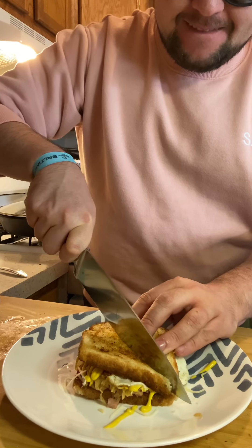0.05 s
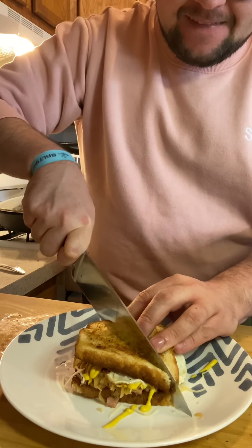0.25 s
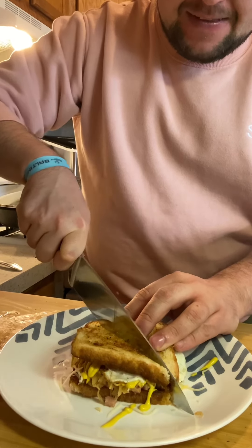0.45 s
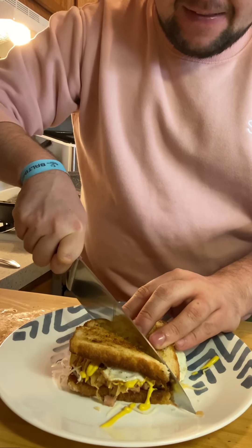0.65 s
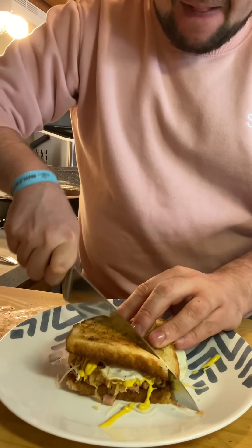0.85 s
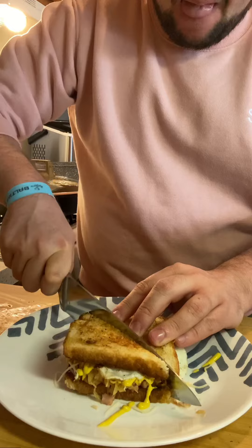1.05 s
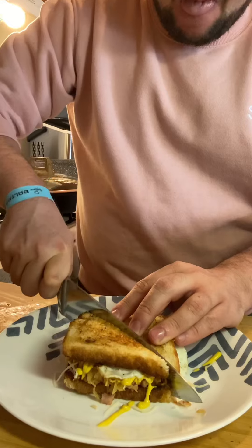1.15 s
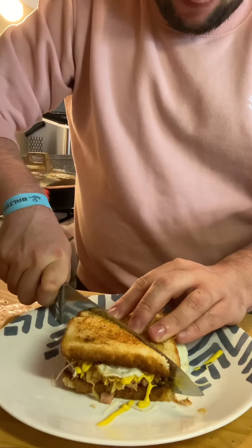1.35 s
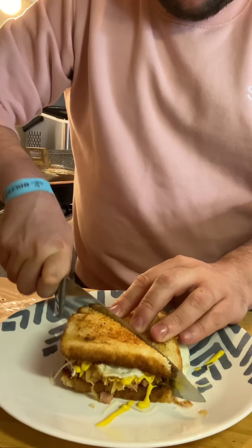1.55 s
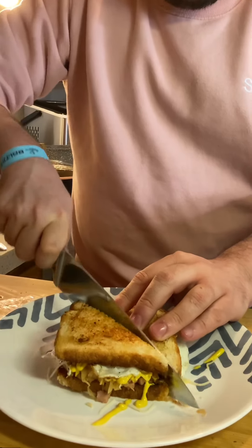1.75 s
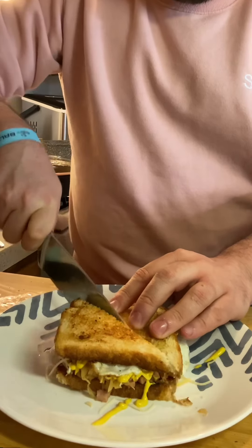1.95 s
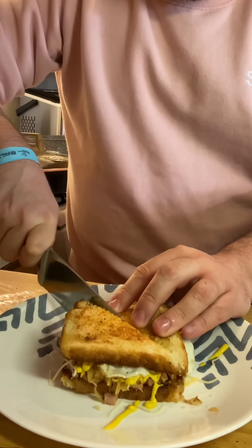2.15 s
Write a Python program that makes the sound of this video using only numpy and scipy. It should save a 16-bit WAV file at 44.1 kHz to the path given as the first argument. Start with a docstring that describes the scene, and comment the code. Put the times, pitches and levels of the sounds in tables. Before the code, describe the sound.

A knife saws through a crisp toasted sandwich, close up in a small kitchen. The crust crunches and crackles in uneven pushes while the blade scrapes the china plate and knocks on it twice sharply, then once faintly.

```python
"""In a small kitchen, a chef's knife saws through a toasted sandwich on a china plate.
Each push crushes the crust into a swarm of tiny fractures while the blade's tip scrapes the china.
Single flakes snap, and the filling squelches once. Three times the blade breaks through and knocks
on the plate; the wooden table thumps and rumbles under the effort."""
import sys
import numpy as np
from scipy import signal
from scipy.fft import rfft, irfft, next_fast_len
from scipy.io import wavfile
from scipy.ndimage import uniform_filter1d

SR = 44100
rng = np.random.default_rng(int(sys.argv[2]) if len(sys.argv) > 2 else 0)


def to_wav(sig):
    """Store sig (one row per channel, or 1-D mono) as 16-bit WAV at the path in sys.argv[1].

    Samples outside -1..1 are clipped; the rate is SR.
    """
    pcm = np.clip(np.atleast_2d(sig), -1, 1) * 32767
    pcm = np.round(pcm).astype(np.int16)
    wavfile.write(sys.argv[1], SR, pcm.T)  # frames by channels


N = 97020
T = np.arange(N) / SR
SIZE = next_fast_len(N + SR // 2, real=True)   # FFT length with space for the room's tail
HZ = np.maximum(np.arange(SIZE // 2 + 1) * SR / SIZE, 1)
MIC_LAG_S = 0.00009   # the left microphone hears the direct sound this much later


def from_db(db):
    """Decibels to gain."""
    return 10 ** (np.asarray(db) / 20)


def rms_one(x):
    """Scale to unit power."""
    return x / np.sqrt(np.mean(x ** 2) + 1e-20)


def steady(x):
    """Even out the slow swings of a low noise."""
    return x / np.sqrt(uniform_filter1d(x ** 2, size=3000) + 1e-12)


def gains(points):
    """An EQ curve of (Hz, dB) points as a gain at every frequency."""
    hz, db = np.transpose(points)
    return from_db(np.interp(np.log(HZ), np.log(hz), db))


def coloured(x, points):
    """Minimum-phase EQ that keeps the power of white noise."""
    cepstrum = irfft(np.log(rms_one(gains(points))), SIZE)
    cepstrum[1:SIZE // 2] *= 2
    cepstrum[SIZE // 2 + 1:] = 0
    return irfft(rfft(x, SIZE) * np.exp(rfft(cepstrum)), SIZE)[..., :N]


def ring(x, hz, t60):
    """A unit click sets a sine of height 1 ringing."""
    r, w = from_db(-60 / (t60 * SR)), 2 * np.pi * hz / SR
    return signal.lfilter([0, np.sin(w)], [1, -2 * r * np.cos(w), r * r], x + 1e-18)


def resonance(x, hz, t60):
    """Band-pass with gain 1 at its centre."""
    r, w = from_db(-60 / (t60 * SR)), 2 * np.pi * hz / SR
    return signal.lfilter(np.array([1, 0, -1]) * (1 - r * r) / 2, [1, -2 * r * np.cos(w), r * r], x)


def contact(start, decay_s, trail_db):
    """One click and a dying trail of smaller ones; unit energy."""
    decay = (T >= start) * np.exp(-np.clip((T - start) / decay_s, 0, 20))
    clicks = from_db(trail_db) * decay * rng.standard_normal(N)
    clicks[int(start * SR)] = 1
    return clicks / np.sqrt(np.sum(clicks ** 2))


def fractures(per_s):
    """A swarm of clicks of very uneven size that come in clumps; unit power."""
    spread_db, clump_db, clumps_per_s = 2.5, 3.0, 110
    clumps = np.interp(T * clumps_per_s, np.arange(N), rng.standard_normal(N))
    sizes_db = spread_db * np.minimum(rng.exponential(1, N), 4) + clump_db * np.clip(clumps, -2, 2)
    return rms_one(from_db(sizes_db) * rng.choice([-1, 1], N) * (rng.random(N) < per_s / SR))


def crust():
    """Each push crushes the crust into crunch and crisp crackle; the blade's tip catches and slips."""
    # Pushes of the knife. Each row: start in seconds, swell time in seconds, rise over the swell in dB,
    # seconds to fade by 60 dB, then the levels of crunch, crackle and scrape in dB.
    pushes = [(0.0, 0.065, 2, 3, -53.5, -56.5, -51), (0.131, 0.091, 24.5, 0.2949, -28.5, -35, -16),
              (0.231, 0.013, -1, 0.215, -34, -35, -20.5), (.36, 0.25, -1, 0.5, -55, -53.5, -73),
              (.665, 0.0095, 6, 0.73, -45, -47, -45), (.803, 0.07, 7, 0.0352, -34.5, -37, -54),
              (1.038, 0.069, 10.5, 0.63, -36.5, -39, -24), (1.216, 0.033, 5.5, 0.1053, -36.5, -37, -28.5),
              (1.27, 0.058, 5.5, 0.11, -45, -46.5, -38.5), (1.328, 0.011, 5.5, 0.25, -26.5, -41.5, -21.5),
              (1.41, 0.17, 3.5, 0.01, -49.5, -85.5, -43), (1.525, 0.023, -2, 0.0241, -43.5, -73.5, -34),
              (1.611, 0.016, -7, 0.9, -65.5, -63, -55), (1.80, 0.05, 6, 1.4, -63.5, -71, -59),
              (2.018, 0.057, 18.5, 0.1, -48, -57, -43.5), (2.085, 0.0082, 6, 0.21, -39.5, -54, -26.5)]
    # Tone of the crushed bread and of its brittle surface. Each row: frequency in Hz, gain in dB.
    crunch_eq = [(60, -17.5), (150, -5.5), (300, -5.5), (550, -5.5), (900, -4.5), (1500, -1), (2200, -1),
                 (2800, -4), (3800, -2.5), (4450, 5.5), (5300, -16), (8000, -10.5), (15000, -34)]
    crackle_eq = [(500, -36), (3000, -17.5), (4700, 1), (5900, 0), (7500, 2.5), (10000, 2), (12500, 3.5),
                  (14000, -0.5), (16000, -12.5)]
    powers = np.zeros((3, N))
    for start, swell, rise_db, fade, *levels_db in pushes:
        age = T - start - swell
        envelope_db = np.where(age < 0, rise_db * np.maximum(age / swell, -1), -60 * age / fade)
        envelope = (T >= start) * from_db(envelope_db)
        powers += (from_db(levels_db)[:, None] * envelope) ** 2
    swarm = fractures(per_s=5000)
    flakes = from_db(-0.5) * fractures(per_s=280)   # lone, larger fractures
    slips = rms_one(fractures(per_s=1500) + flakes / 2)
    bread = rms_one(swarm + flakes / 2)
    surface = rms_one(fractures(per_s=5000) + flakes)
    crunch, crackle, scrape = np.sqrt(powers) * [bread, surface, slips]
    return coloured(crunch, crunch_eq) + coloured(crackle, crackle_eq) + blade(scrape)


def blade(x):
    """Slips and jolts sound through the resonances of blade and plate."""
    # Steel on china. Each row: frequency in Hz, ring time (t60) in seconds, gain in dB.
    rings = [(766.5, 0.045, -3.5), (1120, 0.028, -6.5), (1517, 0.031, 4.5), (1837, 0.022, 5.5),
             (2225, 0.028, 4.5), (2398, 0.055, 5.5), (2920, 0.024, 1), (3337, 0.022, 0.5),
             (4407, 0.017, -3.5)]
    return sum((-1) ** k * from_db(db) * resonance(x, hz, t60) for k, (hz, t60, db) in enumerate(rings))


def wooden_table():
    """The table rumbles while the knife works and takes the blows with low thumps."""
    # Fader moves. Each row: time in seconds, rumble level in dB, thudding level in dB before its trim.
    shake = [(0.0, -54, -53), (0.13, -65, -58), (0.2, -41, -36.5), (0.24, -43, -29), (0.27, -29.5, -26),
             (0.29, -38, -30.5), (0.36, -50.5, -46.5), (0.51, -46.5, -53.5), (0.73, -45.5, -56.5),
             (0.86, -36.5, -42.5), (0.95, -49, -70.5), (1.04, -65, -57), (1.11, -39, -41),
             (1.21, -45.5, -47), (1.27, -36.5, -43.5), (1.32, -54.5, -47.5), (1.37, -40, -25.5),
             (1.41, -46, -41), (1.45, -50, -47.5), (1.5, -49, -57), (1.54, -37.5, -45.5), (1.571, -47, -57),
             (1.61, -56.5, -50.5), (1.699, -65.5, -71.5), (1.95, -65, -76.5), (2.1, -64, -59.5),
             (2.14, -65, -59), (2.2, -84, -57)]
    # Tone of the deep rumble and of the thudding above it. Each row: frequency in Hz, gain in dB.
    rumble_eq = [(25, -34.5), (42, -18.5), (56, 6), (80, 3), (100, -8), (130, -23.5), (250, -41.5)]
    thudding_eq = [(70, -28.5), (100, -7.5), (125, 3.5), (185, -3.5), (260, -13), (400, -12), (600, -26.5),
                   (1500, -54.5)]
    # Blows to the wood. Each row: start in seconds, pitch in Hz, level in dB, t60 in seconds.
    thumps = [(0.263, 128, -21, 0.032), (0.272, 64, -22, 0.1), (0.775, 56.5, -31, 0.23),
              (1.244, 77, -29, 0.16), (1.364, 151, -7.5, 0.049), (1.376, 59.8, -25, 0.15),
              (2.127, 77.2, -33.5, 0.25)]
    thudding_trim_db, attack_s = -2, 0.0038
    times, rumble_db, thudding_db = np.transpose(shake)
    rumble = steady(coloured(rng.standard_normal(N), rumble_eq))
    thudding = steady(coloured(rng.standard_normal(N), thudding_eq))
    wood = from_db(np.interp(T, times, rumble_db)) * rumble
    wood += from_db(thudding_trim_db + np.interp(T, times, thudding_db)) * thudding
    for start, hz, db, t60 in thumps:
        age = np.maximum(T - start, 0)
        envelope = from_db(db - 60 * age / t60) * (1 - np.exp(-age / attack_s))
        wood += envelope * np.sin(2 * np.pi * hz * age)
    return wood


def snaps():
    """Single flakes break with a dry click; each rings for an instant and jolts the blade."""
    # Breaking flakes. Each row: start in seconds, treble level in dB, body level in dB.
    breaks = [(0.0173, -50.5, -45), (0.0598, -47, -44.5), (0.136, -39, -43), (0.153, -38, -36.5),
              (.445, -34, -37.5), (0.467, -58, -63), (.510, -59, -44), (.571, -40, -41.5),
              (.622, -48, -38.5), (0.681, -51, -46), (.695, -46, -46.5), (0.711, -41, -41),
              (0.719, -41.5, -48), (.767, -37, -37.5), (0.4916, -41, -41.5), (0.5598, -41.5, -44.5),
              (0.594, -58, -48), (0.613, -35.5, -37.5), (.672, -33.5, -41), (.750, -31.5, -43.5),
              (0.806, -26, -36.5), (0.8168, -32, -53), (.828, -36, -49), (0.8384, -31, -23),
              (.887, -38.5, -39), (.9925, -58.5, -48), (1.005, -55.5, -57), (1.019, -60.5, -61.5),
              (1.043, -39.5, -38.5), (1.061, -41, -38.5), (1.089, -43, -36.5), (1.128, -30.5, -37),
              (1.22, -39, -33), (1.332, -38.5, -24), (1.339, -41.5, -27.5), (1.421, -39, -34),
              (1.459, -36, -32.5), (1.4939, -42, -38), (1.531, -49, -32), (1.626, -51.5, -57),
              (1.918, -57, -51), (1.9548, -54, -64.5), (2.095, -40, -38)]
    # Tone of a snap's body and of its treble. Each row: frequency in Hz, gain in dB.
    body_eq = [(150, -12.5), (600, -7), (1800, 0.5), (2700, -4), (3900, 5), (5400, 2.5), (8000, -7.5),
               (15000, -25.5)]
    treble_eq = [(500, -31), (3000, -14), (5500, 13.5), (8000, 2), (12000, -2.5), (16000, -3)]
    flake_hz, spread_octaves, ring_db = 10260, 0.11, 10.5
    splinters_s, jolt_db = 0.0017, -3.5
    body, treble = np.zeros((2, N))
    for start, treble_db, body_db in breaks:
        snap = contact(start, splinters_s, trail_db=-16) * np.sqrt(2 * splinters_s * SR)
        hz = min(flake_hz * 2 ** (spread_octaves * rng.standard_normal()), SR / 3)
        flake = snap + from_db(ring_db) * resonance(snap, hz, t60=0.0009)
        body += from_db(body_db) * snap
        treble += from_db(treble_db) * flake * snap.std() / flake.std()
    return coloured(body, body_eq) + coloured(treble, treble_eq) + blade(from_db(jolt_db) * body)


def knocks():
    """The blade cracks down and chatters on the plate; bending waves bring the low modes in later."""
    # Blade meets plate. Each row: start in seconds, level of the steel's crack in dB.
    hits = [(.2602, -16.5), (1.3565, -21.5), (2.1095, -42)]
    # Damped modes of plate and blade; the place of contact sets how hard each is struck. Each row:
    # frequency in Hz, t60 in seconds, then the peak in dB for the first, second and third knock.
    plate_modes = [(487.7, 0.099, -21.5, -44, -39.5), (531, 0.034, -10.5, -26.5, -47),
                   (762, 0.085, -30, -31, -48), (913, 0.042, -14, -25.5, -36),
                   (1024.5, .05, -17.5, -36, -35), (1120, 0.051, -30.5, -16, -60),
                   (1415, 0.059, -16.5, -38, -46), (1590, 0.057, -11.5, -22.5, -43.5),
                   (1745, 0.031, -20.5, -9.5, -38), (2216, 0.027, -21.5, -17, -24),
                   (2560, 0.029, -34, -22.5, -45), (3960, 0.043, -25.5, -29, -55),
                   (5430, .02, -10.5, -32.5, -52), (6370, 0.036, -13.5, -33, -49)]
    # Tone of the sharp crack. Each row: frequency in Hz, gain in dB.
    crack_eq = [(300, -15), (1200, -4.5), (2200, -1.5), (3000, -5.5), (4300, 6), (5300, 0.5), (7000, -4),
                (9000, -14), (15000, -31.5)]
    chatter_s, chatter_db, lag_at_1khz_s = 0.003, -12.5, 0.0013
    ringing, cracks = np.zeros((2, N))
    for k, (start, crack_db) in enumerate(hits):
        cracks += from_db(crack_db) * contact(start, chatter_s, chatter_db) * np.sqrt(2 * chatter_s * SR)
        for hz, t60, *peaks_db in plate_modes:
            arrival = start + lag_at_1khz_s * 1000 / hz
            mode = ring(contact(arrival, chatter_s, chatter_db), hz, t60)
            ringing += from_db(peaks_db[k]) * mode / np.abs(mode).max()
    return ringing + coloured(cracks, crack_eq)


def squelch():
    """A small pocket of air whistles out of the wet filling."""
    # The whistle's glide. Each row: time in seconds, pitch in Hz, level in dB.
    glide = [(0.538, 1050, -79), (.538, 926, -30.5), (0.547, 836, -57), (.552, 832, -36), (0.559, 878, -37),
             (.570, 980, -48), (0.581, 1014, -44), (.598, 1070, -70)]
    times, hz, db = np.transpose(glide)
    envelope = from_db(np.interp(T, times, db)) * (T > times[0]) * (T < times[-1])
    return envelope * np.sin(2 * np.pi * np.cumsum(np.interp(T, times, hz)) / SR)


def kitchen(x):
    """Two microphones hear the direct sound, reflections off plate, table and cook, then the room."""
    # Reverb bands. Each row: centre in Hz, decay time (t60) in seconds, level in dB.
    bands = [(150, 0.71, -17.5), (703, 0.4, -11), (1500, 0.27, -11.5), (3980, 0.17, -17.5),
             (10000, 0.085, -20)]
    early_db, early_t60_s = -5.5, 0.038
    t = T[:SR // 2]
    centres = np.log([row[0] for row in bands])
    noise = rfft(rng.standard_normal((2, len(t))), SIZE)
    early = rng.standard_normal((2, len(t))) * from_db(-60 * t / early_t60_s) * (t > 0.001)
    response = from_db(early_db) * rms_one(early)
    for share, (hz, t60, db) in zip(np.eye(len(bands)), bands):
        band = irfft(noise * np.interp(np.log(HZ), centres, share), SIZE)[:, :len(t)]
        decay = rms_one(from_db(-60 * t / t60) * (t > 0.005))
        response += from_db(db) * band * decay
    reverb = rfft(response / np.sqrt(len(t)), SIZE)
    direct = np.exp(-2j * np.pi * HZ * np.array([[MIC_LAG_S], [0]]))
    return irfft(rfft(x, SIZE) * (direct + reverb), SIZE)[:, :N]


def room_tone():
    """A faint bed of low noise and hiss, partly shared by both channels."""
    # Tone of the bed. Each row: frequency in Hz, gain in dB.
    bed_eq = [(25, -10), (65, 3.5), (150, -7), (400, -12), (650, -29), (2000, -26), (3500, -19.5),
              (5500, -36.5), (11000, -27.5), (15000, -43)]
    noise = rng.standard_normal(N) + 0.65 * rng.standard_normal((2, N))
    return from_db(-65.5) * coloured(noise, bed_eq)


def scene():
    """Knife, sandwich and plate in the kitchen's reverb, over room tone and the table's rumble."""
    return room_tone() + kitchen(crust() + snaps() + knocks() + squelch()) + wooden_table()


def record(dry):
    """The recorder widens some bands at even loudness, rounds peaks and cuts bottom and top."""
    # Stereo width. Each row: frequency in Hz, gain of the side against the mid in dB.
    side_eq = [(400, -0.5), (560, -2), (850, 11), (2000, 7.5), (4000, -4.5), (5700, 8), (7500, -3),
               (10000, -10.5), (14000, 8)]
    low_cut_hz, stopband_hz = 42, 17000
    low_cut = signal.butter(4, low_cut_hz, "high", fs=SR, output="sos")
    high_cut = signal.cheby2(12, 70, stopband_hz, fs=SR, output="sos")
    left, right = rfft(signal.sosfilt(low_cut, dry), SIZE)
    width = gains(side_eq)
    angle = np.pi * HZ * MIC_LAG_S
    widening_gain = np.hypot(np.cos(angle), width * np.sin(angle))   # for the direct sound
    mid = (left + right) / 2 / widening_gain
    side = width * (left - right) / 2 / widening_gain
    wide = irfft(np.array([mid + side, mid - side]), SIZE)[:, :N]
    return signal.sosfilt(high_cut, np.tanh(wide))


dry = scene()
out = record(dry)
to_wav(out)
```